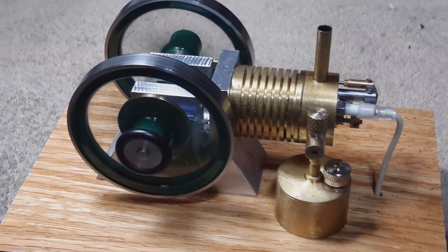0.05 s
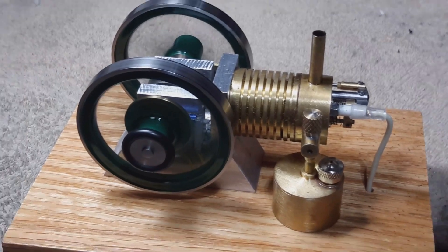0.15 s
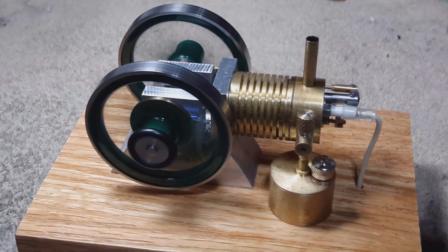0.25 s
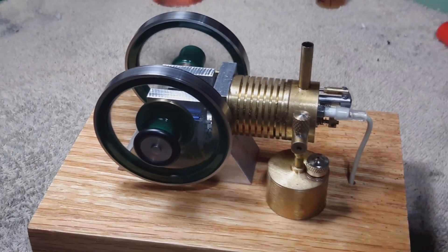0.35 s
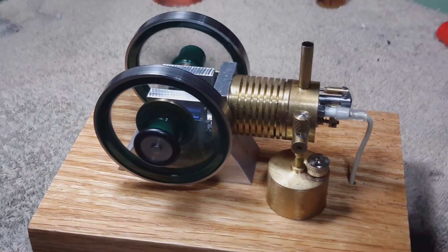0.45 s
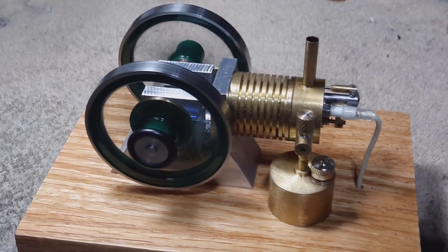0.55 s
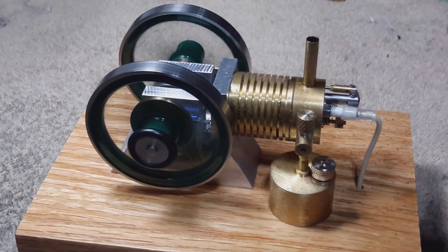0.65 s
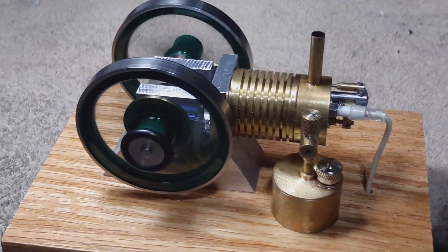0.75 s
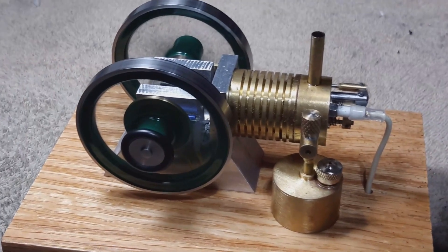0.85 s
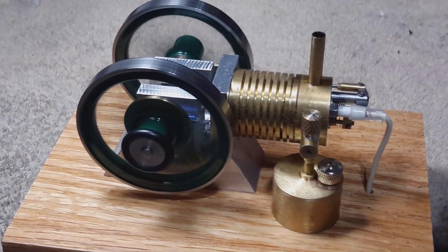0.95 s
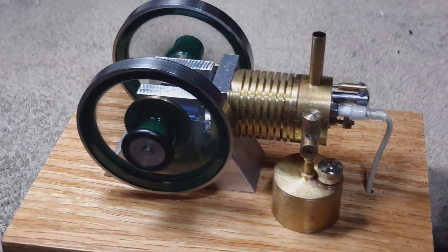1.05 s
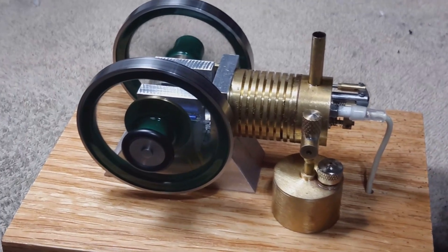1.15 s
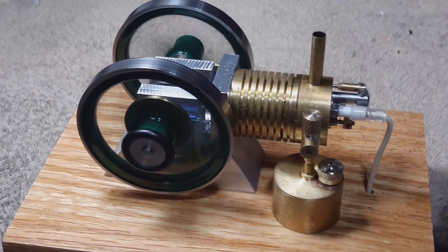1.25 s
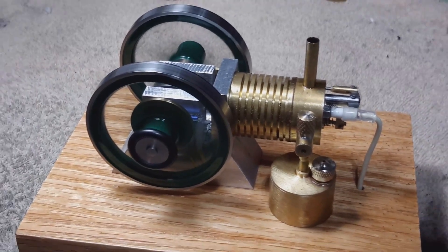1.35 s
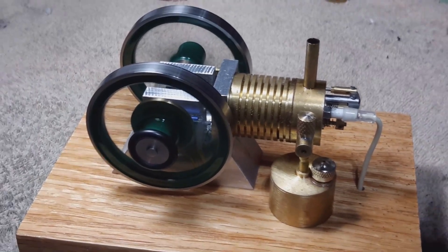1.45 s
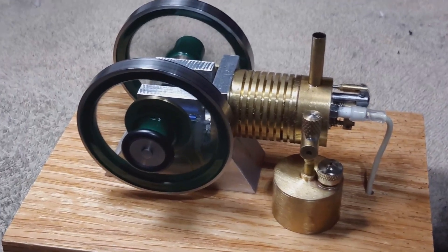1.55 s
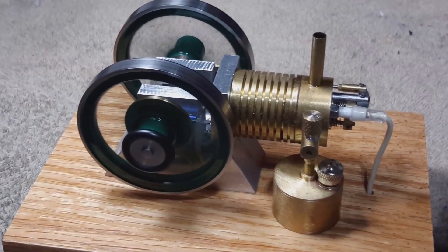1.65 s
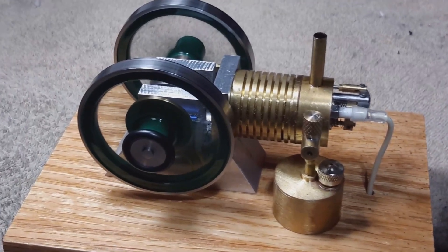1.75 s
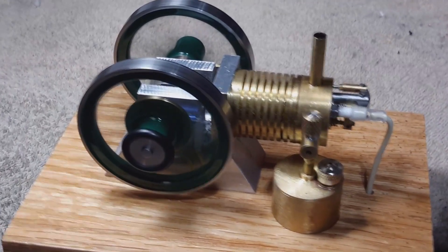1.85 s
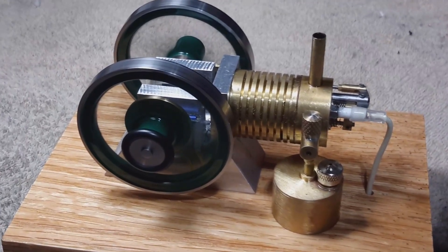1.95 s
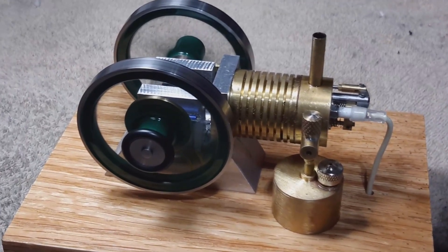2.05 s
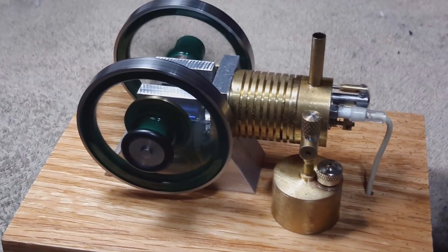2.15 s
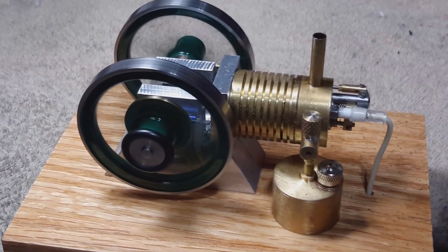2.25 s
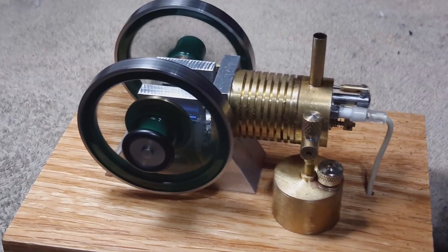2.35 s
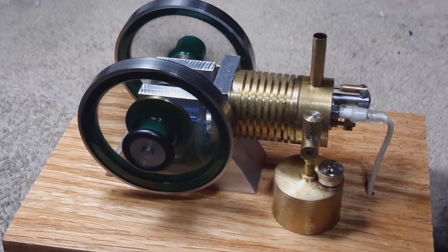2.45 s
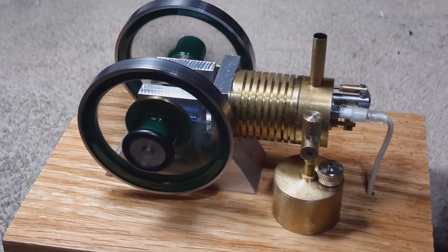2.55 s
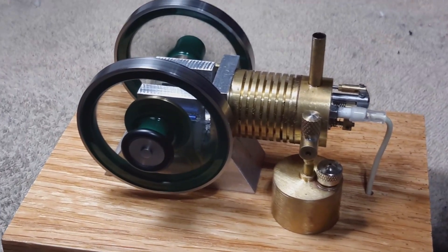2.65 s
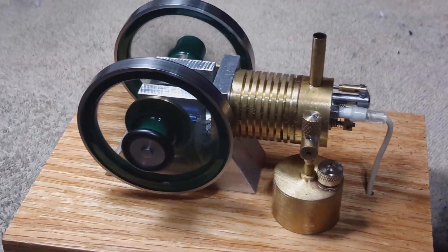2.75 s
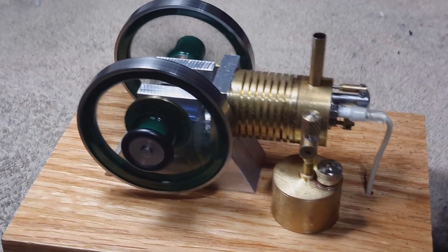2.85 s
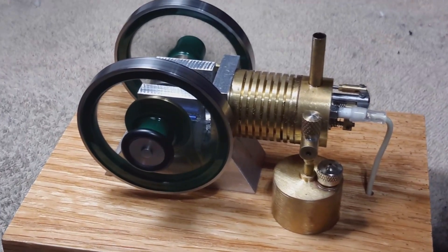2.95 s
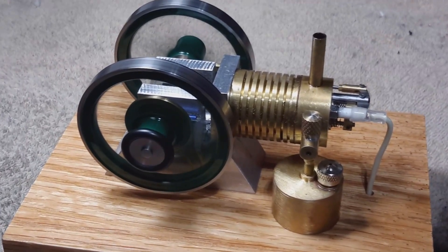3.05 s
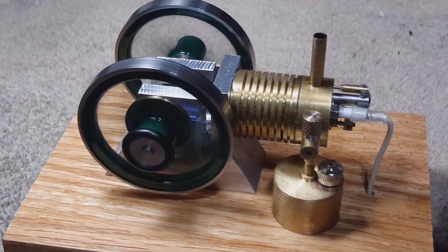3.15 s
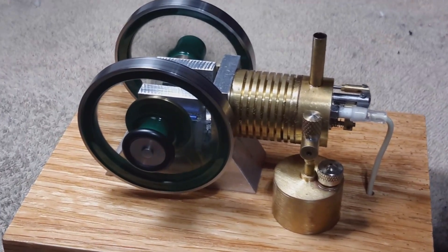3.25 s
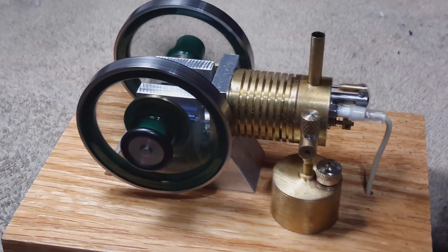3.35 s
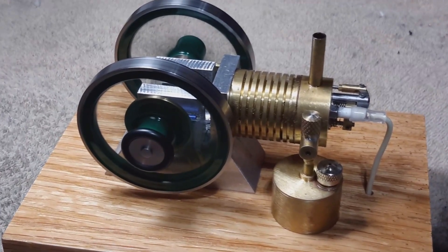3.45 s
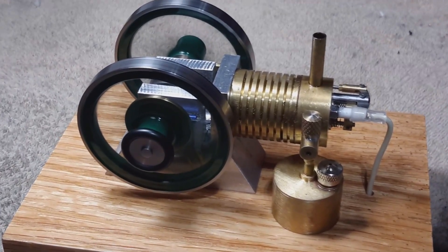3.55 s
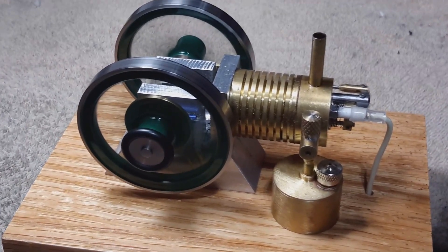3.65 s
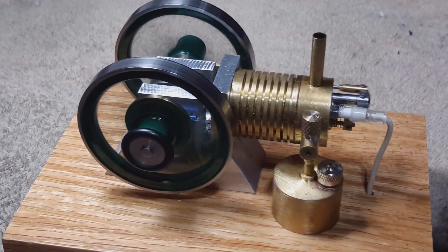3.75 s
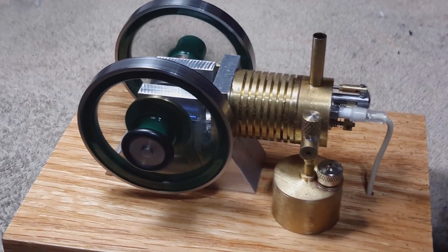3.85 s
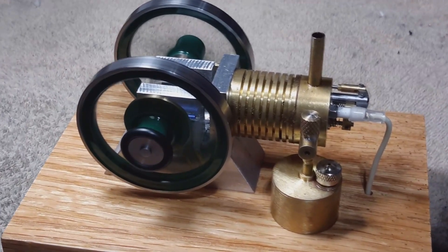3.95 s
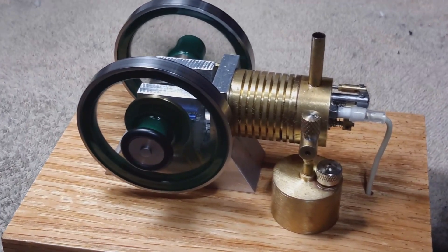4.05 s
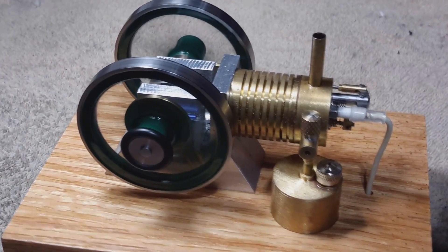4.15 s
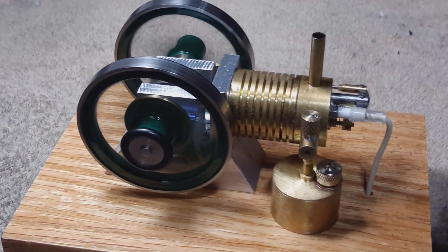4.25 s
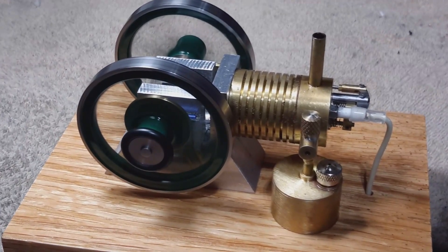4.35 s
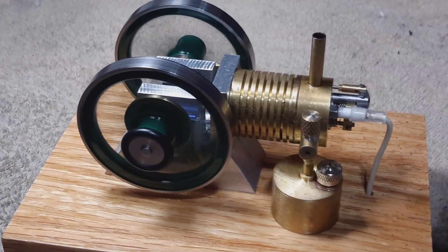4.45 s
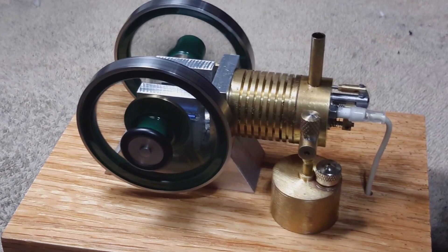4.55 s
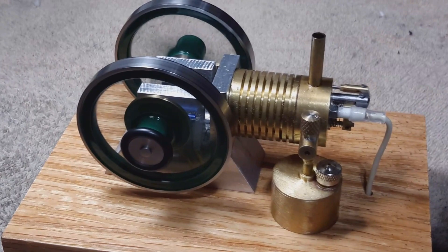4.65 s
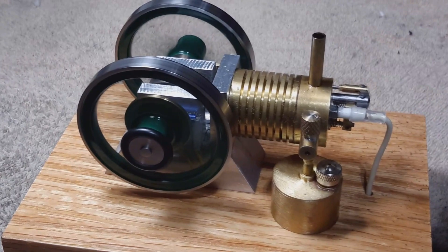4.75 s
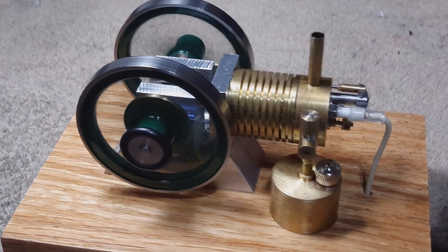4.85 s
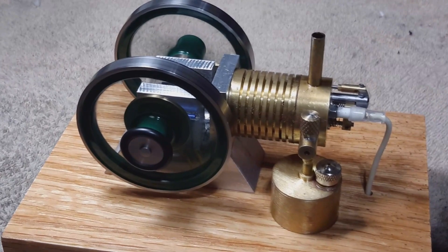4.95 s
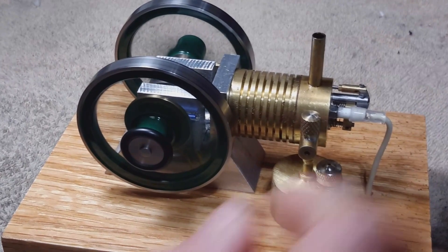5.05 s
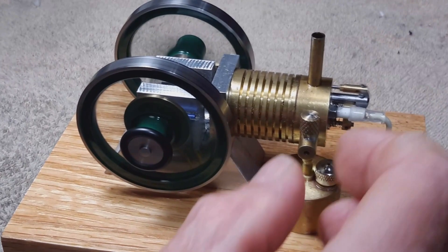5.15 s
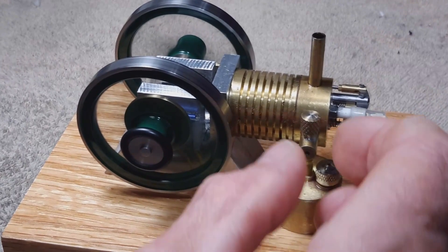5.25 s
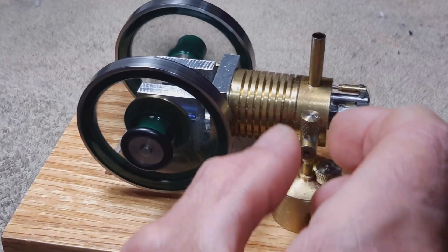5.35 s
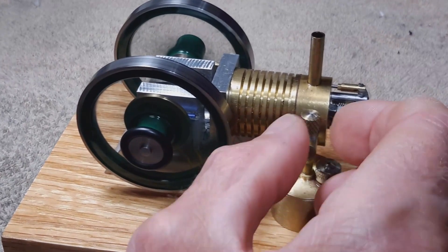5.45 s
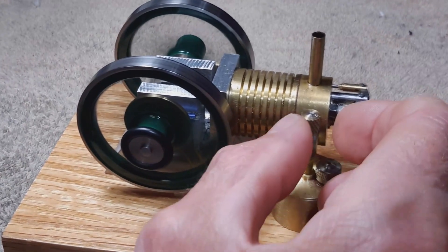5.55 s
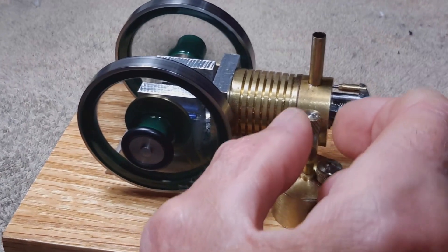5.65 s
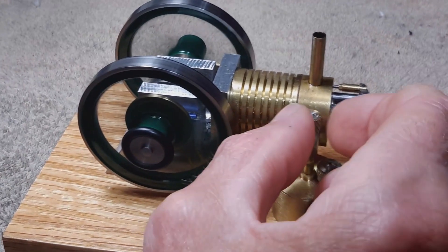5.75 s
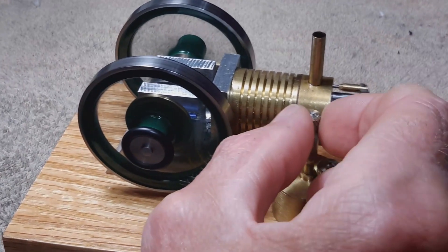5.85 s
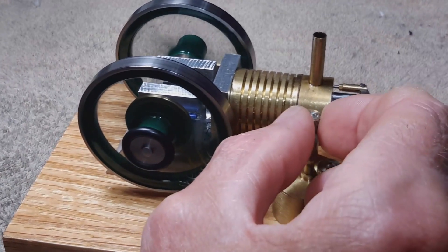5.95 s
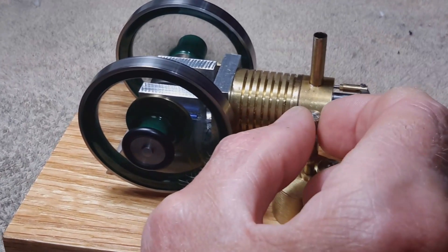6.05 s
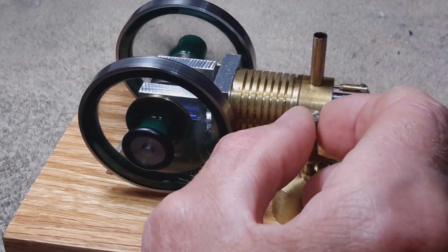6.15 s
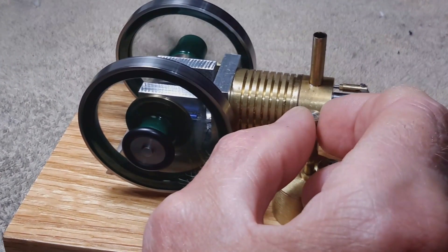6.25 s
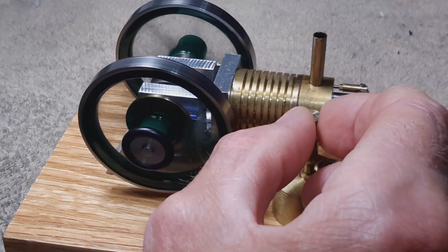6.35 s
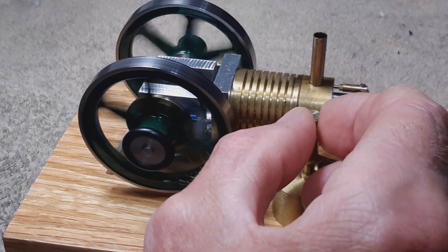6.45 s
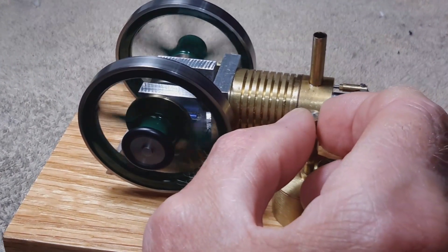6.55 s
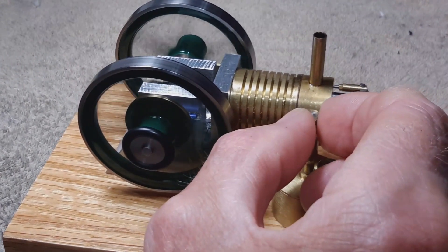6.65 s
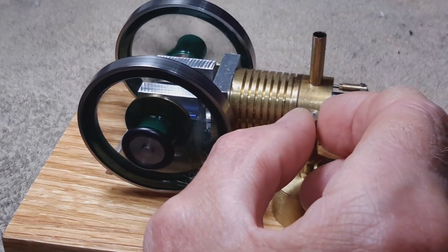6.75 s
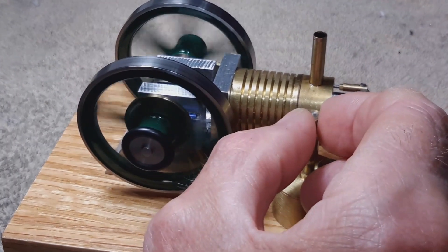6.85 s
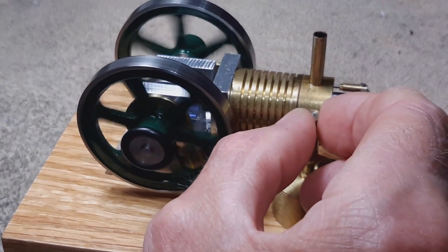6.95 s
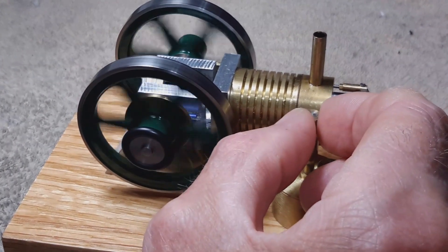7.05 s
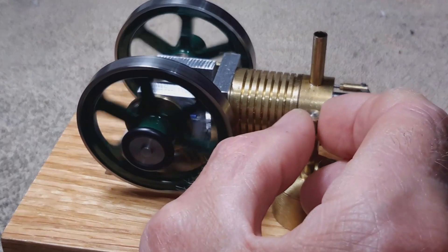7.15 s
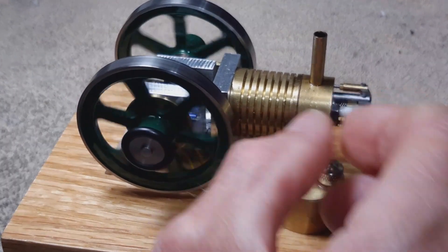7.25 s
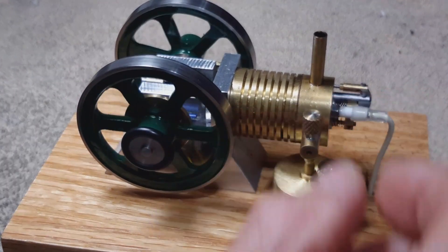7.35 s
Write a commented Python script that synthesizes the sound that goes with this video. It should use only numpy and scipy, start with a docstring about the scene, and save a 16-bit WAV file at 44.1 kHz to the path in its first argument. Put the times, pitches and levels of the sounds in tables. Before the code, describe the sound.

From the start a miniature single-cylinder engine runs close to the microphone in a workshop with a short, tight reverberation. Bright metallic valve clacks, rod knocks and gritty gear ticking repeat about twelve to fourteen times a second, with a fluttering intake slap in each cycle. Over this, sharp dry exhaust cracks with a small thump come unevenly, roughly every 0.15 to 0.4 seconds; unfired cycles give only soft puffs, slowing a little until the next crack. This continues steadily to about 5.2 seconds, when a hand closes in and adds a hollow, cupped resonance. Firings bunch together from 5.6, the last at about 6.0. From 6.35 the gear rattle dies quickly, leaving separate, duller clacks and intake gulps, with a short scrape near 6.77. Ever weaker ticks follow until about 7.35, over a faint bass-heavy hush.

```python
"""Steel clacks and sharp exhaust cracks open the scene: a miniature single-cylinder four-stroke on a board.
It fires every second to fifth cycle; the flywheels slow in between. Uneven impacts make the valve gear,
gears and cracks, pressure pulses make the exhaust and intake puffs, and the sprung intake valve flutters.
A hand closes round the carburettor to shut off the fuel; the engine clacks to a stop over a faint hush."""
import sys
import numpy as np
from scipy import signal
from scipy.fft import rfft, irfft
from scipy.io import wavfile

SR = 44100
rng = np.random.default_rng(int(sys.argv[2]) if len(sys.argv) > 2 else 0)


def wav_out(sig):
    """Save sig, one row per channel (or a flat mono array), as 16-bit PCM at SR to the path in sys.argv[1]."""
    wavfile.write(sys.argv[1], SR, np.round(np.clip(np.atleast_2d(sig).T, -1, 1) * 32767).astype(np.int16))


N = 326340  # samples
T = np.arange(N) / SR  # s


def undb(db):
    """Gain of a level in dB."""
    return 10 ** (np.asarray(db) / 20)


def unit(x):
    """Scale to an energy of one."""
    return x / np.sqrt(np.sum(x ** 2))


def level(x, db):
    """Scale to an rms level in dB."""
    return x * undb(db) / np.sqrt(np.mean(x ** 2))


def scatter(like, spread):
    """One random offset for each event."""
    return spread * rng.standard_normal(len(like))


def convolve(x, response):
    """Pass x through an impulse response, cut to the scene's length."""
    return signal.fftconvolve(x, response)[:N]


def colour(x, points, size=2048):
    """Causal filter through (f/Hz, level/dB) points that keeps the power of white noise and thins deep bass."""
    hz, db = np.transpose(points)
    f = np.fft.rfftfreq(size, 1 / SR) + 1
    bass_cut = np.hypot(1, (hz[0] / 2 / f) ** 2)
    gain = undb(np.interp(np.log(f), np.log(hz), db)) / bass_cut
    # folding the cepstrum gives minimum phase: the sound starts at once
    cepstrum = irfft(np.log(gain))
    cepstrum[1:size // 2] *= 2
    cepstrum[size // 2 + 1:] = 0
    return convolve(x, unit(irfft(np.exp(rfft(cepstrum)))))


def ring(x, modes):
    """Decaying sines set off by x; modes are (f/Hz, t60/s, level/dB)."""
    t = T[:SR // 2]
    response = sum(undb(db - 60 * t / t60) * np.sin(2 * np.pi * hz * t) for hz, t60, db in modes)
    return convolve(x, unit(response))


def place(times, db, shapes):
    """Lay one shape at each time; its energy is that of a millisecond at the given level."""
    out = np.zeros(N + SR)
    for s, gain, shape in zip(times, undb(db) * np.ones(len(times)), shapes):
        i = max(int(s * SR), 0)
        out[i:i + len(shape)] += gain * unit(shape) * np.sqrt(SR / 1000)
    return out[:N]


def chatter(times, db, decay_ms, grain_db=4, rise_ms=0.15, size=1536):
    """Short bursts of uneven impacts, as when loose steel parts meet and bounce."""
    ms = T[:size] * 1000
    fine, coarse = np.moveaxis(rng.standard_normal((len(times), 2, size)), 1, 0)
    # a firm first contact, then random ones; each dies within about a millisecond
    contacts = undb(grain_db * coarse) * (np.roll(coarse, 7, axis=1) > 1.5)
    contacts[:, 0] = 2.8
    grains = np.sqrt(signal.lfilter([1], [1, -.94], contacts ** 2 + .01, axis=1))
    decay = np.exp(-ms / np.reshape(decay_ms, (-1, 1)))
    rise = 1 - np.exp(-ms / rise_ms)
    return place(times, db, fine * grains * decay * rise)


def puffs(times, db, length_ms):
    """Smooth pressure pulses: a quick rise and a slower fall."""
    age = T[:1024] * 1000 / length_ms
    return place(times, db, [age * np.exp(-age)] * len(times))


# firings, also played by the exhaust: [t/s, relative crack level/dB, relative thump level/dB]
FIRINGS = [(0.0448, -4.5, -30), (0.3484, -6, -30), (0.6587, -8.5, -29), (0.8802, -8.5, -29),
           (1.0178, -1.5, -29), (1.232, -5, -27), (1.4444, -2, -27.5), (1.6527, -4, -28),
           (2.0307, -4.5, -31.5), (2.2542, -2.5, -28.5), (2.388, -6.5, -30.5), (2.7844, -4, -30.5),
           (3.0293, -3.5, -31.5), (3.1778, -4, -30.5), (3.5109, -4, -30.5), (3.7515, -6, -29.5),
           (4.0942, -5, -30.5), (4.335, -4.5, -32), (4.6631, -5.5, -29.5), (4.9983, -5, -31),
           (5.244, -5.5, -31.5), (5.5747, -4.5, -30.5), (5.7239, -3, -26), (5.8697, -5, -28),
           (6.011, -5.5, -29)]
LAST_CYCLE_END_S = 6.346
USUAL_CYCLE_S = .079  # two turns of the flywheels
FRICTION = 33.7  # drop of (cycles per s)^2 in each cycle
BARK_LAG_S = .0024  # the exhaust valve opens late against a burnt charge


def cycles():
    """(start s, length s, fired): firings spin the flywheels up, friction takes equal energy every cycle."""
    starts = np.append(np.array(FIRINGS)[:, 0] - BARK_LAG_S, LAST_CYCLE_END_S)
    rates = np.linspace(12, 18, 600)  # candidate speeds after a firing, cycles per s
    rows = []
    for start, span in zip(starts, np.diff(starts)):
        # a whole number of ever slower cycles fills the time until the next firing
        count = round(span / USUAL_CYCLE_S)
        lengths = np.maximum(rates[:, None] ** 2 - FRICTION * np.arange(count), 1) ** -.5
        lengths = lengths[np.argmin(abs(lengths.sum(axis=1) - span))]
        rows += [(start + lengths[:k].sum(), length, k == 0) for k, length in enumerate(lengths)]
    # one cycle without firing leads in
    lead_in = (starts[0] - rows[2][1], rows[2][1], 0)
    start, length, fired = np.transpose([lead_in] + rows)
    return start, length, fired > 0


# colours of exhaust tappet, closing valve seat, rod knock and ignition contact: [f/Hz, level/dB]
TAPPET = [(300, -8.5), (1300, -17), (1800, -9.5), (2600, -14.5), (3400, -9.5), (4400, -9.5), (5200, -16),
          (6400, -16), (7400, -2), (8300, -0.5), (9600, -8.5), (13000, -20.5), (15500, -18), (16500, -24)]
SEAT = [(300, -34), (1300, -25), (1800, -42), (2600, -8), (3400, -39), (4400, -29), (5200, -15),
        (6400, -5.5), (7400, -7), (8300, 8), (9600, 0.5), (13000, -21), (15500, -24), (16500, -23)]
KNOCK = [(400, -10), (1300, -9), (1850, 1.5), (2500, -10.5), (3150, 7), (3900, -8.5), (4400, -12.5),
         (5200, -8.5), (6400, -18), (7400, -2.5), (8300, 9), (9600, -7.5), (13000, -9), (15500, -6.5),
         (16500, -5)]
CONTACT = [(300, -7), (1300, -12.5), (1800, -3.5), (2600, -10), (3400, -5), (4400, -9), (5200, -14),
           (6400, -16.5), (7400, -3), (8300, 7.5), (9600, -6), (13000, -13.5), (15500, -0.5), (16500, -18)]
SPEED_DB_PER_DOUBLING = 3.5  # the valve gear strikes harder at speed
BLOW_SCATTER_DB = 1.6  # from cycle to cycle


def valve_gear(start, length, fired):
    """The tappet lifts the exhaust valve, the valve seats, slack in the rod knocks, the contact snaps."""
    def blow(turn, db, decay_ms, rise_ms, jitter_s):
        """One blow at a given fraction of every cycle, harder in the faster cycles."""
        times = start + turn * length + scatter(start, jitter_s)
        speed_db = SPEED_DB_PER_DOUBLING * np.log2(USUAL_CYCLE_S / length)
        levels = db + speed_db + scatter(times, BLOW_SCATTER_DB)
        heard = times > 0
        return chatter(times[heard], levels[heard], decay_ms, grain_db=2.0, rise_ms=rise_ms)

    tappet_turn = .002 + fired * BARK_LAG_S / length
    tappet = blow(tappet_turn, np.where(fired, -16, -12.2), decay_ms=8.2, rise_ms=0.33, jitter_s=.0001)
    seat = blow(.268, np.where(fired, -21, -18), decay_ms=1.6, rise_ms=.15, jitter_s=.0003)
    # just after a firing the slack is taken up early and gently
    knock_turn = np.where(fired, .288, .344)
    knock = blow(knock_turn, np.where(fired, -18.5, -13.8), decay_ms=5.1, rise_ms=0.48, jitter_s=.0005)
    contact = blow(.631, -18, decay_ms=5.7, rise_ms=0.6, jitter_s=0.00075)
    clacks = colour(tappet, TAPPET) + colour(seat, SEAT) + colour(knock, KNOCK) + colour(contact, CONTACT)
    return clacks + rod((start + knock_turn * length)[1:], db=-28)


# ringing modes of the rod: [f/Hz before detuning, t60/s, level/dB]
ROD = [(3070, 0.02, 15.5), (3037, 0.024, 0.5), (2850, 0.023, 3), (4440, 0.046, 8)]
ROD_DETUNE = 0.042  # spread of pitch from knock to knock, as a fraction


def rod(times, db):
    """The rod rings after each knock, at a pitch that changes with how it is seated."""
    t = T[:SR // 10]
    shapes = []
    for pitch in 1 + scatter(times, ROD_DETUNE):
        modes = [undb(mode_db - 60 * t / t60) * np.sin(2 * np.pi * hz * pitch * t) for hz, t60, mode_db in ROD]
        shapes.append(sum(modes))
    return place(times, db + scatter(times, 2.8), shapes)


# colour of the exhaust crack: [f/Hz, level/dB]
CRACK = [(500, -34), (1200, -12), (2100, -34), (2800, -8), (3500, -9.5), (4500, -10), (5500, -21.5),
         (6600, -14.5), (7700, -0.5), (9000, -7.5), (10500, -8), (12000, -10.5), (14000, -4.5),
         (16500, -11.5)]
# modes of the exhaust thump: [f/Hz, t60/s, level/dB]
THUMP = [(125, 0.15, -8), (196, 0.027, 5.5), (319, 0.023, -4), (479, 0.027, -4), (651, 0.017, -2)]
THUMP_LOW_HZ = 106  # the small pipe radiates little below this


def exhaust(misses):
    """A burnt charge leaves with a thump and a sharp crack; an unburnt one only puffs."""
    times, crack_db, thump_db = np.transpose(FIRINGS)
    mouth = signal.butter(3, THUMP_LOW_HZ, "high", fs=SR, output="sos")

    def wave(at, db, length_ms):
        """Pressure, followed a millisecond later by as much suction."""
        pulse = puffs(at, db, length_ms) - puffs(at + .001, db, length_ms)
        return signal.sosfilt(mouth, ring(pulse, THUMP))

    bark = wave(times - 0.0003, thump_db, length_ms=0.13)
    soft = wave(misses + 0.00344, scatter(misses, 0.86), length_ms=0.11)
    crack = colour(chatter(times + .0005, crack_db, decay_ms=1.4, grain_db=4.0, rise_ms=0.39), CRACK)
    outflow = puffs(times, thump_db, length_ms=0.37)  # the plain push of gas leaving the pipe
    return level(bark, -41.0) + level(outflow, -57) + level(soft, -52) + level(crack, -34.0)


# colour of the intake's air: [f/Hz, level/dB]
INTAKE = [(60, -23.5), (130, 1.5), (240, 2.5), (500, -4.5), (800, -1), (1300, -11.5), (2100, -1),
          (3500, -20.5), (6000, -6.5), (15000, -45)]


def intake(times, db, count=7):
    """Suction lifts the sprung intake valve, which slaps shut repeatedly, ever faster and mostly weaker."""
    k = np.arange(count)
    gaps_s = .004 * .96 ** k * (1 + .05 * rng.standard_normal((len(times), count)))
    slaps = (times[:, None] + np.cumsum(gaps_s, axis=1) - gaps_s).ravel()
    # the second slap tends to be the strongest
    slap_db = -2.0 * abs(k - 1) + 1.83 * rng.standard_normal((len(times), count))
    levels = (db[:, None] + slap_db).ravel()
    air = chatter(slaps, levels - 29.5, decay_ms=1.55)
    suction = puffs(slaps, levels - 33, length_ms=0.037)
    return colour(air - suction, INTAKE) + undb(-11.0) * colour(air, GEARS)


# last clacks as the flywheels stop and rock back: [t/s, relative level/dB]
CLACKS = [(6.3428, -7), (6.374, -9.5), (6.385, -6.5), (6.421, -10), (6.4705, -9), (6.5099, -14),
          (6.5284, -8), (6.577, -14), (6.6617, -12), (6.7096, -18), (6.9239, -18), (6.9568, -19.5),
          (7.0393, -17.5), (7.0945, -22), (7.1871, -23.5), (7.2677, -26.5), (7.364, -30)]
# colour of the slow clacks: [f/Hz, level/dB]
SLOW = [(180, -29.5), (300, -11.5), (696, -28), (1000, -14.5), (1280, -18.5), (1640, -12), (2200, -9.5),
        (2700, -14.5), (3130, -13.5), (3630, -8.5), (4880, -15.5), (5300, -19), (5850, -15.5),
        (6150, -23.5), (8140, -0.5), (9930, -17), (15500, -26)]
# colour of the wooden board under the engine: [f/Hz, level/dB]
BOARD = [(200, 1), (400, -7), (1100, 0), (2000, -12.5), (15000, -58)]
# decay of a clack while the flywheels spin, ever briefer as they slow
CLACK_FAST_MS, CLACK_SLOW_MS, CLACK_SETTLE_S = 5.1, 3, 0.23


def last_clacks():
    """Single clacks of the valve gear as it stops, each with a dull knock from the board."""
    times, db = np.transpose(CLACKS)
    speed = np.exp(-(times - LAST_CYCLE_END_S) / CLACK_SETTLE_S)
    decay_ms = CLACK_SLOW_MS + (CLACK_FAST_MS - CLACK_SLOW_MS) * speed
    blows = chatter(times, db, decay_ms, grain_db=1, rise_ms=.35)
    return level(colour(blows, SLOW), -45.0) + level(colour(blows, BOARD), -66.5)


# colour of the timing gears, also lent to the intake slaps: [f/Hz, level/dB]
GEARS = [(300, -7.5), (1300, -7), (1800, -4), (2600, -5), (3400, -4), (4400, -11.5), (5200, -15.5),
         (6400, -9.5), (7400, 2.5), (8300, 3.5), (9600, -2), (13000, -13.5), (15500, -27), (16500, -20)]


def gears(start, length, count=32):
    """Timing gear teeth tick unevenly, loudest about a third of the way through each cycle."""
    turn = np.arange(count) / count
    running = (start[:, None] + length[:, None] * turn).ravel()
    load_db = np.tile(3.7 * np.cos(2 * np.pi * (turn - .33)), len(start))
    slowing = np.arange(LAST_CYCLE_END_S, T[-1], .004)
    times = np.append(running, slowing + scatter(slowing, 0.0015))
    levels = np.append(load_db, np.zeros(len(slowing))) + gear_db(times) + scatter(times, 3.63)
    heard = times > 0
    return colour(chatter(times[heard], levels[heard], decay_ms=3.9), GEARS)


# gear scrapes as the flywheels stall against the compression and roll back:
# [t/s at the loudest, half length/s, level/dB]
SCRAPES = [(6.767, 0.02, -38.5), (6.875, 0.12, -50.5)]
GEAR_DB, GEAR_EASE_DB_PER_S, GEAR_FADE_DB_PER_S, GEAR_IDLE_DB = -33.5, .5, 98, -71.5


def gear_db(times):
    """The rattle eases slightly while the engine runs, dies as it coasts and swells with each scrape."""
    coasting_s = np.maximum(times - LAST_CYCLE_END_S, 0)
    rattle = undb(GEAR_DB - GEAR_EASE_DB_PER_S * times - GEAR_FADE_DB_PER_S * coasting_s)
    scrapes = sum(undb(db) * np.exp(-((times - s) / half_s) ** 2) for s, half_s, db in SCRAPES)
    return 20 * np.log10(rattle + scrapes + undb(GEAR_IDLE_DB))


# modes of the engine's metal: [f/Hz, t60/s, level/dB]
METAL = [(1720, .06, -8), (1855, .07, -7), (2277, .05, -5), (3162, .07, -9), (3693, .09, -12),
         (4430, .1, -10), (7450, .07, -3), (7720, .07, -3), (7930, .07, -2), (8140, .08, -1),
         (8370, .07, -3), (8612, .15, -3), (15450, .07, -6)]


def metal(steel):
    """The engine's metal rings with every steel blow."""
    return undb(-21.0) * ring(steel, METAL)


# modes of the hand's hollow: [f/Hz, t60/s, level/dB]
HAND = [(930, 0.032, 1), (1097, 0.025, 0.94), (2070, 0.0098, 0.082)]
HAND_ARRIVES_S, HAND_MOVE_S, HAND_FAR_DB, HAND_NEAR_DB = 5.24, .25, -32, -5


def hand(x):
    """The hollow of the hand closing the fuel needle resonates with the engine, more as it comes near."""
    near = .5 + .5 * np.tanh((T - HAND_ARRIVES_S) / HAND_MOVE_S)
    return undb(HAND_FAR_DB + (HAND_NEAR_DB - HAND_FAR_DB) * near) * ring(np.gradient(x), HAND)


# low modes of the room: [f/Hz, t60/s, level/dB]
ROOM_MODES = [(115.4, 0.73, -14), (160, 0.12, -4), (198, 0.4, 0), (240.8, 0.083, 12), (350, 0.75, -15)]
ROOM_T60_S, ROOM_TREBLE_T60_S = 0.18, 0.16


def workshop(x):
    """Early echoes from board and floor, a short tail whose treble dies first, and a few low room modes."""
    t = T[:SR // 2]
    noise = rng.standard_normal((2, len(t)))
    low = signal.sosfilt(signal.butter(2, 4000, fs=SR, output="sos"), noise[0])
    treble = noise[0] - low
    tail = low * undb(-60 * t / ROOM_T60_S) + treble * undb(-60 * t / ROOM_TREBLE_T60_S)
    early = noise[1] * np.exp(-t / 0.00097) * (t > .001)
    echoes = undb(-12.5) * convolve(x, unit(tail * (t > .006))) + undb(-17.0) * convolve(x, unit(early))
    return echoes + undb(-33.5) * ring(x, ROOM_MODES)


# colour of the background hush: [f/Hz, level/dB]
HUSH = [(25, -4), (60, -5), (110, 0), (170, 2), (300, -7), (600, -15), (1300, -22), (4000, -27),
        (15000, -42)]


def hush():
    """Steady noise, strongest in the bass, lies faintly behind everything."""
    return undb(-65.5) * colour(rng.standard_normal(N), HUSH)


# last gulps of the intake valve: [t/s, relative level/dB]
GULPS = [(6.387, -1), (6.477, -11), (6.537, -4.5), (6.669, -12.5), (7.061, -24.5)]
# relative suction level, and its change in the faster stroke after a firing
INTAKE_DB, FAST_SUCK_DB = -1.3, -0.1


def scene():
    """Valve gear, exhaust and intake follow the same cycles; the workshop answers over a faint hush."""
    start, length, fired = cycles()
    steel = valve_gear(start, length, fired) + gears(start, length) + last_clacks()
    suck_s = (start + .375 * length)[1:]
    suck_db = INTAKE_DB + FAST_SUCK_DB * fired[1:]
    gulp_s, gulp_db = np.transpose(GULPS)
    air = intake(np.append(suck_s, gulp_s), np.append(suck_db, gulp_db))
    misses = start[~fired][1:]
    engine = steel + metal(steel) + exhaust(misses) + air + hand(air + steel)
    return (engine + workshop(engine) + hush())[None]


def record(dry):
    """The microphone thins the deep bass and a steep filter cuts the top."""
    thin = signal.sosfilt(signal.butter(1, 45, "high", fs=SR, output="sos"), dry)
    return signal.sosfilt(signal.ellip(10, .2, 70, 15950, fs=SR, output="sos"), thin)


dry = scene()
out = record(dry)
wav_out(out)
```